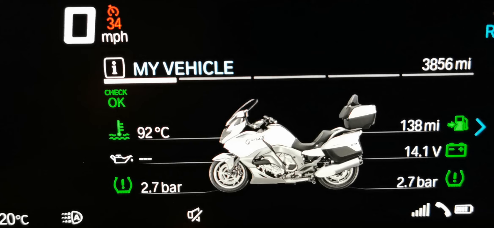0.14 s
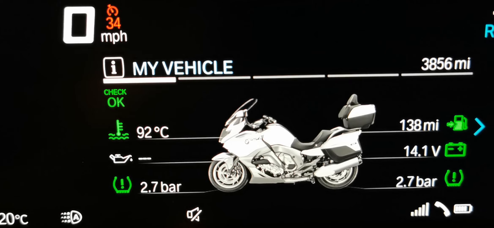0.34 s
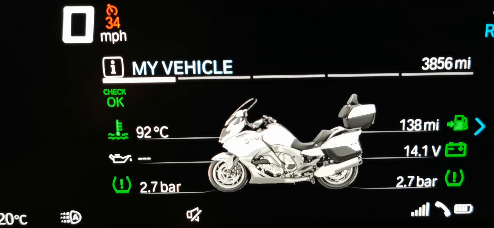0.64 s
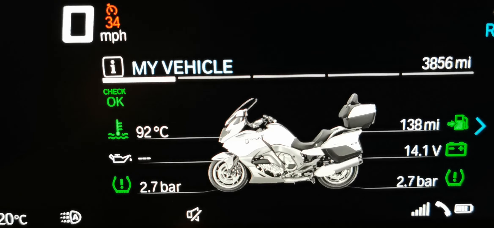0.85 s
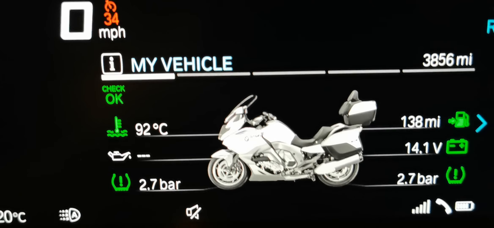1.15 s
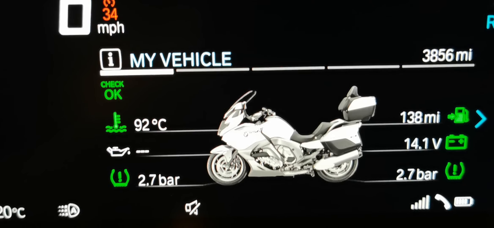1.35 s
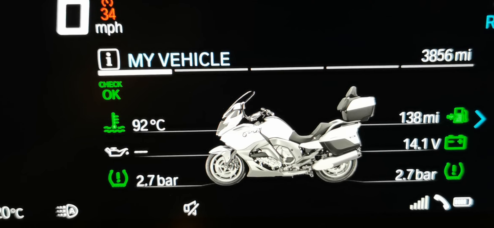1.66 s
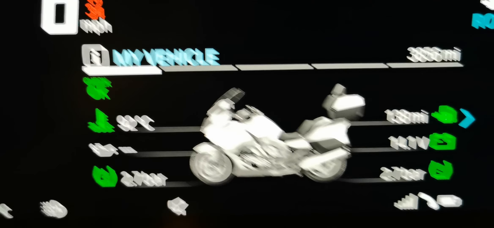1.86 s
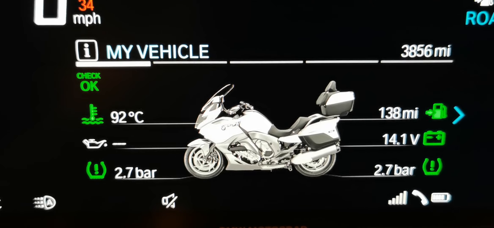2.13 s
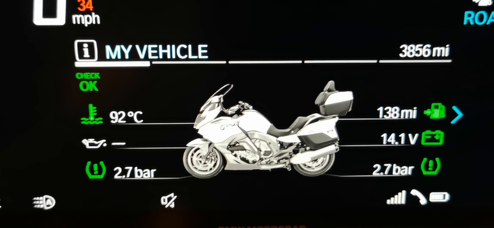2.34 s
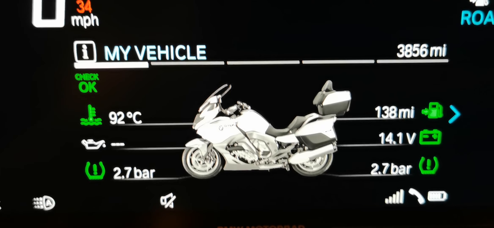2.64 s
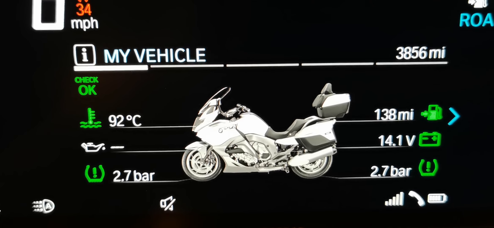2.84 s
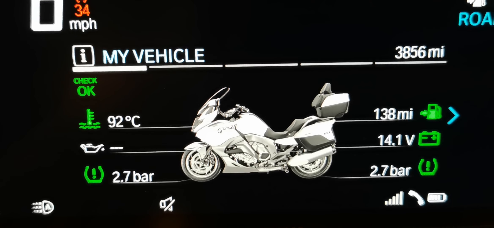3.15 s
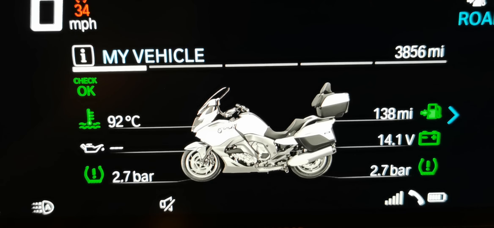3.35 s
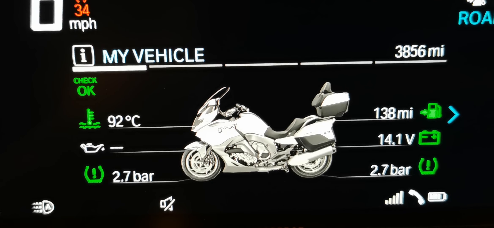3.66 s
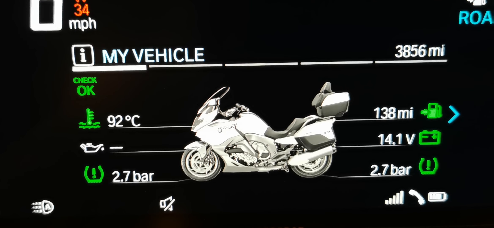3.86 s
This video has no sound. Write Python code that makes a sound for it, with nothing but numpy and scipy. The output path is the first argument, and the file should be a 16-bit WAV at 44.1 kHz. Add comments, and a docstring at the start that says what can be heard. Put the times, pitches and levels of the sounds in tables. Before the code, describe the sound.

A six-cylinder motorcycle engine idles steadily, low hollow throbbing under fine mechanical rattle and ticking.

```python
"""Rider's seat of a six-cylinder motorcycle idling near 900 rpm; sound cuts in after a short silence.
Firings drone as phase-locked harmonics and thump as pulses through damped body modes.
A hollow gliding resonance swells in each four-stroke cycle, over low churning noise.
Valve-gear noise, bunched at the firings, rustles, rings the engine covers and ticks.
Injectors add very high noise clicks."""
import sys
import numpy as np
from scipy import signal
from scipy.fft import rfft, irfft
from scipy.io import wavfile
from scipy.ndimage import map_coordinates

SR = 44100
rng = np.random.default_rng(int(sys.argv[2]) if len(sys.argv) > 2 else 0)


def store_wav(level_fs):
    """Save 16-bit WAV to argv[1]."""
    pcm = np.round(np.clip(np.atleast_2d(level_fs), -1, 1) * 32767)
    wavfile.write(sys.argv[1], SR, pcm.T.astype(np.int16))


N = 176400
T = np.arange(N) / SR
FREQS = np.maximum(np.arange(N // 2 + 1) * SR / N, 1)


def amp(db):
    """dB to amplitude ratio."""
    return 10 ** (np.asarray(db) / 20)


def level(x, db):
    """Scale to an overall rms in dB."""
    return x * amp(db) / np.sqrt(np.mean(x ** 2))


def by_hz(points):
    """Interpolate (f/Hz, value) on a log-frequency axis."""
    hz, value = np.array(points).T
    return np.interp(np.log(FREQS), np.log(hz), value)


def resonances(modes):
    """Summed response of damped modes (f/Hz, width/Hz, level/dB)."""
    total = 0
    for hz, width_hz, db in modes:
        detuning = (FREQS ** 2 - hz ** 2) / (FREQS * width_hz)
        total = total + amp(db) / (1 + 1j * detuning)
    return total


def shaped(x, response):
    """Filter by a frequency response."""
    return irfft(rfft(x) * response, N)


def walk(rate_hz):
    """Smooth random wandering, rms 1: Gaussian-lowpassed noise."""
    return level(shaped(rng.standard_normal(N), np.exp(-(FREQS / rate_hz) ** 2)), 0)


def blend(a, b, share):
    """Power-weighted mix; share is the power fraction of a."""
    share = np.clip(share, 0, 1)
    return np.sqrt(share) * a + np.sqrt(1 - share) * b


# Left-right correlation: f/Hz, correlation [-1..1]
STEREO_CORRELATION = [(130, 0.87), (290, 0.97), (640, 0.64), (1300, -0.46), (3000, 0.14), (15000, -0.23)]


def spread(pair):
    """Two unrelated signals become left and right with frequency-dependent correlation."""
    correlation = np.clip(by_hz(STEREO_CORRELATION), -1, 1)
    mid = shaped(pair[0], np.sqrt(1 + correlation))
    side = shaped(pair[1], np.sqrt(1 - correlation))
    return np.array([mid + side, mid - side])


# Cylinders in firing order: relative thump level/dB, relative tick level/dB, thump lag/firings
CYLINDERS = [(11, -6, 0.0496), (-13.5, -4.5, .1), (-12.5, -5.5, 0.0637), (0.5, -5.5, 0.018),
             (0.5, -15, .04), (-4.5, -8.5, 0.16)]
TICK_RISE_FIRINGS, TICK_FALL_FIRINGS = .13, .4


def each_cycle(firing, count):
    """Random pattern of count points repeating every engine cycle."""
    pattern = rng.standard_normal(count)
    place = firing / len(CYLINDERS) % 1 * count
    return level(map_coordinates(pattern, [place], mode="grid-wrap"), 0)


def beats(firing):
    """Contact envelope at each firing: fast rise, slower fall, strength per cylinder."""
    k, part = firing.astype(int), firing % 1
    size = amp(np.array(CYLINDERS)[:, 1])
    size = size / size.max()
    falling = size[k % len(size)] * np.exp(-(part / TICK_FALL_FIRINGS) ** 2)
    rising = size[(k + 1) % len(size)] * np.exp(-((1 - part) / TICK_RISE_FIRINGS) ** 2)
    return falling + rising


# Injector click modes: f/Hz, width/Hz, level/dB (relative)
INJECTOR_MODES = [(13600, 500, 0), (14200, 700, -2)]
INJECTOR_DB, INJECTOR_DECAY_S, INJECTOR_SCATTER_DB = -57, .004, 1.5


def injectors(firing):
    """Decaying noise burst at each firing excites very high modes."""
    k = firing.astype(int)
    scatter_db = INJECTOR_SCATTER_DB * rng.standard_normal(k[-1] + 1)[k]
    size = amp(np.array(CYLINDERS)[k % len(CYLINDERS), 1] + scatter_db)
    age_s = T - np.interp(k, firing, T)
    bursts = rng.standard_normal((2, N)) * size * np.exp(-age_s / INJECTOR_DECAY_S)
    return level(shaped(bursts, resonances(INJECTOR_MODES)), INJECTOR_DB)


LEFT_LAG_S, FAIRING_DECAY_S = .00028, 0.0023
DIRECT_SHARE, FAIRING_SHARE = 0.31, 0.67  # power fractions


def fairing(x):
    """Direct path reaches the right first; short reflections per side; diffuse rest."""
    paths = rng.standard_normal((2, N)) * np.exp(-T / FAIRING_DECAY_S)
    paths /= np.sqrt(np.sum(paths ** 2, axis=1, keepdims=True))
    direct = np.exp(-2j * np.pi * FREQS * np.array([[LEFT_LAG_S], [0]]))
    near = shaped(x[0], blend(direct, rfft(paths), DIRECT_SHARE))
    return blend(near, spread(x[1:]), FAIRING_SHARE)


# Valve gear and chain spectrum: f/Hz, level/dB (relative, per Hz)
GEAR_SPECTRUM = [(400, -18), (700, 4.5), (870, 2), (1150, 1.5), (1450, 0.5), (1900, 2.5), (2600, 1),
                 (3100, -6), (3800, -8), (5000, -14.5), (6000, -12.5), (6800, -9), (7600, -24.5),
                 (9000, -23), (15000, -26)]
GEAR_DB, GEAR_PULSE, GEAR_GRAIN, GEAR_REPEAT = -33, 0.37, 0.28, .15
# Ringing cover modes: f/Hz, width/Hz, level/dB (relative)
COVER_MODES = [(865, 35, -2), (980, 35, -6), (1832, 36, 1.5), (1890, 30, -2), (2268, 32, -3),
               (2703, 30, -5), (3650, 130, -11.5), (3960, 70, -12), (4505, 55, -8.5)]
COVER_DB, COVER_PULSE, COVER_FLARE_DB = -34.5, 0.44, 0.5
# Bright tick spectrum: f/Hz, level/dB (relative, per Hz)
TICK_SPECTRUM = [(1500, -21), (4000, 0.5), (6800, 4.5), (7700, -2.5), (9000, 5), (10000, -1.5), (12000, 0),
                 (14500, -5), (16000, -9)]
TICK_DB, TICK_PULSE, TICK_GRAIN = -45, 1.35, .3


def valve_gear(firing, rattle_db, tick_db):
    """Contact noise bunched at the firings: rustle, ringing covers, bright ticks."""
    beat = beats(firing)
    contacts = blend(each_cycle(firing, count=130), walk(590), GEAR_REPEAT)

    def rattle(pulse, grain):
        """Noise pulsed by the firings and grained by the contacts."""
        return rng.standard_normal((3, N)) * (1 + pulse * beat) * np.exp(grain * contacts / 2)

    rustle = shaped(fairing(rattle(GEAR_PULSE, GEAR_GRAIN)), amp(by_hz(GEAR_SPECTRUM)))
    cover_hits = rattle(COVER_PULSE, GEAR_GRAIN) * amp(COVER_FLARE_DB * walk(2.6))
    covers = shaped(fairing(cover_hits), resonances(COVER_MODES))
    ticks = shaped(spread(rattle(TICK_PULSE, TICK_GRAIN)), amp(by_hz(TICK_SPECTRUM)))
    rattling = level(rustle, GEAR_DB) + level(covers, COVER_DB)
    return amp(rattle_db) * rattling + amp(tick_db) * level(ticks, TICK_DB)


# Crankcase churn spectrum: f/Hz, level/dB (relative, per Hz)
CHURN_SPECTRUM = [(20, -13), (38, -11), (55, -14), (75, 0.5), (112, -8.5), (160, -4.5), (240, 2),
                  (300, -3.5), (350, 1), (415, -0.5), (455, -4.5), (495, -1), (585, -12), (680, -4),
                  (780, -14.5), (1000, -25.5), (1400, -32.5)]
CHURN_DB, CHURN_REPEAT, CHURN_PULSE = -27.5, 0.19, 0.79
CHURN_SURGE_DEPTH, CHURN_SURGE_AT_FIRINGS = 0.22, 4.35


def churn(firing):
    """Dull crankcase noise, partly repeating, surging once a cycle and pulsing at firings."""
    repeating = np.array([each_cycle(firing, count=600) for _ in range(2)])
    pair = blend(repeating, rng.standard_normal((2, N)), CHURN_REPEAT)
    cycle_phase = 2 * np.pi * (firing - CHURN_SURGE_AT_FIRINGS) / len(CYLINDERS)
    surge = 1 + CHURN_SURGE_DEPTH * np.cos(cycle_phase)
    pulsed = pair * surge * (1 + CHURN_PULSE * beats(firing))
    return level(shaped(spread(pulsed), amp(by_hz(CHURN_SPECTRUM))), CHURN_DB)


# Hollow swells: peak/firings, rise/firings, fall/firings, f/Hz at peak, peak level/dB (before scatter)
HOLLOW_SWELLS = [(3.82, 1.08, .52, 355, -20), (5.45, .5, .5, 370, -30.5)]
SWELL_GLIDE_HZ_PER_S, SWELL_JITTER_S = 550, .0002
SWELL_SCATTER_DB, SWELL_SCATTER_HZ, SWELL_STRETCH = 1.1, 2.5, .1


def throb(firing):
    """Hollow resonance swelling at fixed places in each cycle, gliding up in pitch."""
    out = np.zeros(N)
    for peak, rise, fall, hz, db in HOLLOW_SWELLS:
        for centre in np.arange(peak, firing[-1], len(CYLINDERS)):
            late, strong, sharp, long = rng.standard_normal(4)
            near = abs(firing - centre) < len(CYLINDERS) / 2
            away = firing[near] - centre
            age_s = T[near] - np.interp(centre, firing, T) + SWELL_JITTER_S * late
            width = np.where(away < 0, rise, fall) * np.exp(SWELL_STRETCH * long)
            swell = np.exp(-(away / width) ** 2)
            # glide integrated: half the slope times age squared
            turns = (hz + SWELL_SCATTER_HZ * sharp + SWELL_GLIDE_HZ_PER_S * age_s / 2) * age_s
            out[near] += amp(db + SWELL_SCATTER_DB * strong) * swell * np.sin(2 * np.pi * turns)
    return out


# Body modes struck by firings: f/Hz, width/Hz, level/dB (relative)
BODY_MODES = [(74, 21, 9), (217, 35, 6), (272, 40, 2.5), (430, 12, -11), (480, 35, 0.5), (678, 27, 2),
              (870, 36, -14)]
THUMP_DB, THUMP_SCATTER_DB, THUMP_JITTER_S = -41, 5, .0003
THUMP_SOFT_HZ = 1500  # the push of a firing has little treble


def thumps(firing):
    """Each firing strikes the body modes with uneven strength and timing."""
    k = np.arange(1, int(firing[-1]))
    chance = rng.standard_normal((len(k), 2))
    db, _, lag = np.array(CYLINDERS)[k % len(CYLINDERS)].T
    at_s = np.interp(k + lag, firing, T) + THUMP_JITTER_S * chance[:, 0]
    strength = amp(db + THUMP_SCATTER_DB * chance[:, 1])
    pulses = np.bincount((at_s * SR).astype(int), strength, N)[:N]
    softening = (1 + 1j * FREQS / THUMP_SOFT_HZ) ** 2
    return level(shaped(pulses, resonances(BODY_MODES) / softening), THUMP_DB)


# Drone harmonics: multiple of firing rate, level/dB (rms, before waver)
DRONE_HARMONICS = [(1, -45.5), (2, -30), (3, -41.5), (4, -33.5), (5, -38.5)]
DRONE_WAVER_DB, DRONE_DISPERSION_RAD = 1.5, 0.888  # higher multiples leave the pipes later


def drone(firing):
    """Low harmonics locked to the firing rate, each wavering in level."""
    total = np.zeros(N)
    for k, db in DRONE_HARMONICS:
        size = np.sqrt(2) * amp(db + DRONE_WAVER_DB * walk(5.6))
        phase = 2 * np.pi * round(k) * firing - DRONE_DISPERSION_RAD * (k - 1) ** 2
        total += size * np.cos(phase)
    return total


# Crank speed: t/s, speed/rpm
CRANK_SPEED = [(.3, 898), (1.2, 898.2), (1.4, 900), (2.75, 900), (2.9, 891), (3.1, 903), (3.45, 903),
               (3.6, 900.5)]
START_PHASE_FIRINGS = .17
# Layer level drift: t/s, throb level/dB, rattle level/dB, tick level/dB
LAYER_DRIFT = [(.35, -2.5, -4, -4), (.9, -0.1, -1.5, 1), (1.5, -0.2, -2, -0.5), (2.2, 1, 0, 0),
               (2.8, 0, 0.1, -0.5), (3.1, 0.7, 1.1, -0.5), (3.5, .5, 0, 0), (4, 1.2, 1, -0.5)]
# Left minus right: f/Hz, level/dB
LEFT_MINUS_RIGHT = [(60, 4.3), (110, 4.1), (200, 2.9), (380, 4.5), (500, -2), (680, 1.6), (850, -3),
                    (1300, -4), (2380, -5.5), (4400, -3), (7000, -1.5), (8500, 3), (10500, -1),
                    (15000, -1.5)]


def scene():
    """Crank drives every layer; half the cylinders fire per turn."""
    rpm = np.interp(T, *np.array(CRANK_SPEED).T)
    firing = START_PHASE_FIRINGS + np.cumsum(rpm / 60 * len(CYLINDERS) / 2) / SR
    times, *columns = np.array(LAYER_DRIFT).T
    throb_db, rattle_db, tick_db = (np.interp(T, times, column) for column in columns)
    clicks = injectors(firing)
    gear = valve_gear(firing, rattle_db, tick_db)
    pulsing = churn(firing) + throb(firing) + thumps(firing)
    engine = clicks + gear + amp(throb_db) * pulsing + drone(firing)
    lean_db = by_hz(LEFT_MINUS_RIGHT) / 2
    return shaped(engine, amp([lean_db, -lean_db]))


START_S, TOP_HZ = .341, 15500


def record(dry):
    """Abrupt start, then a steep lowpass."""
    lowpass = signal.ellip(10, .1, 90, TOP_HZ, fs=SR, output="sos")
    return signal.sosfilt(lowpass, dry * (T >= START_S))


dry = scene()
out = record(dry)
store_wav(out)
```